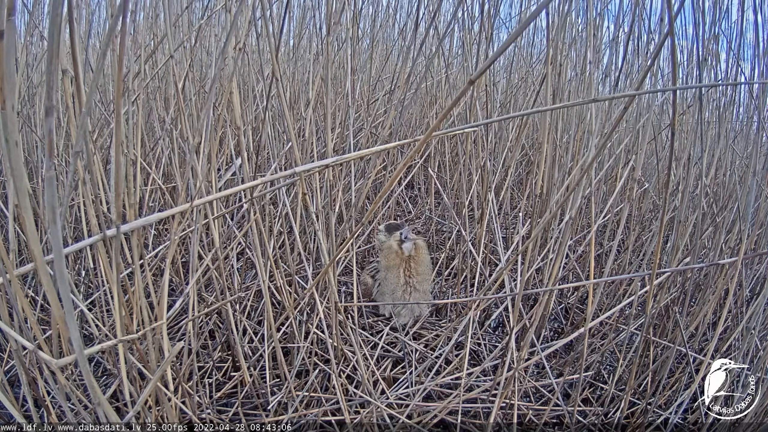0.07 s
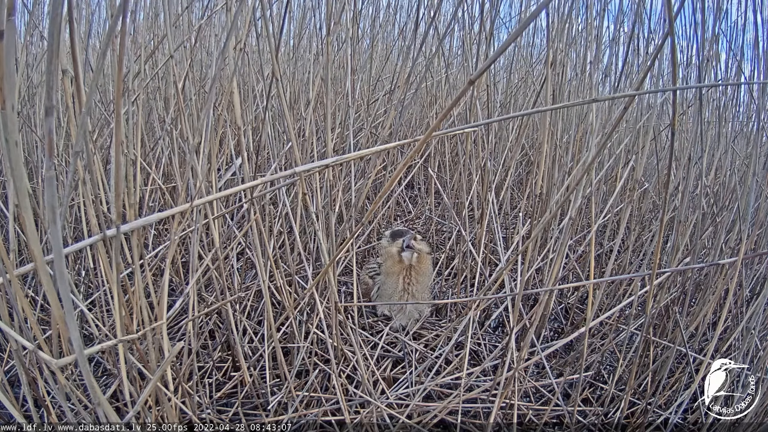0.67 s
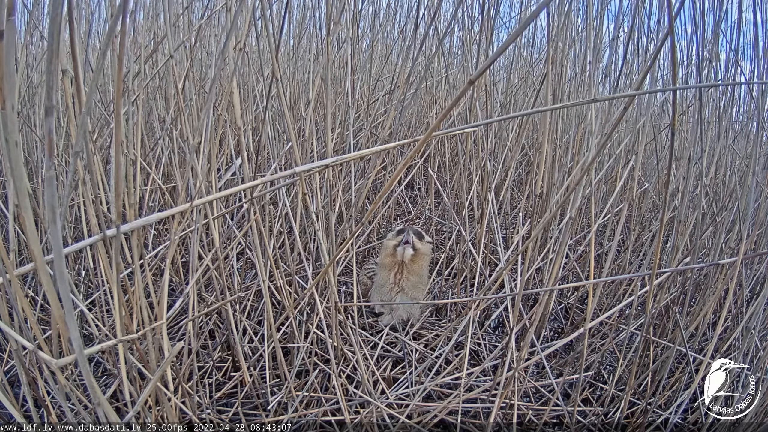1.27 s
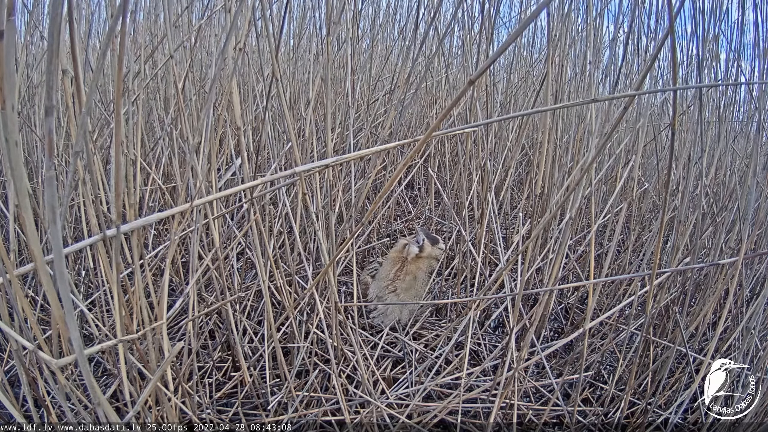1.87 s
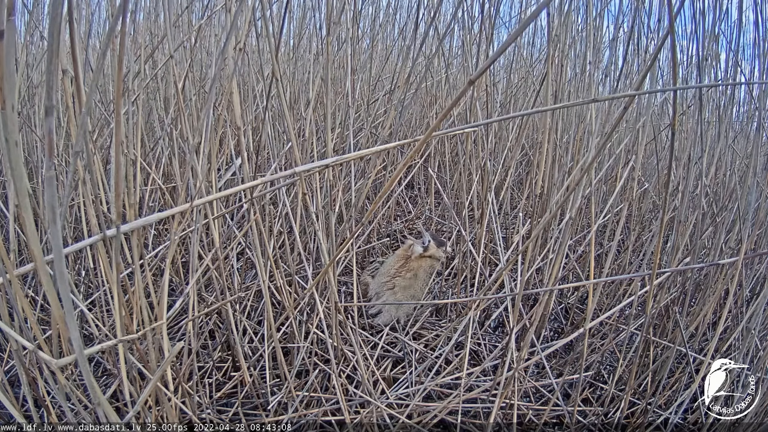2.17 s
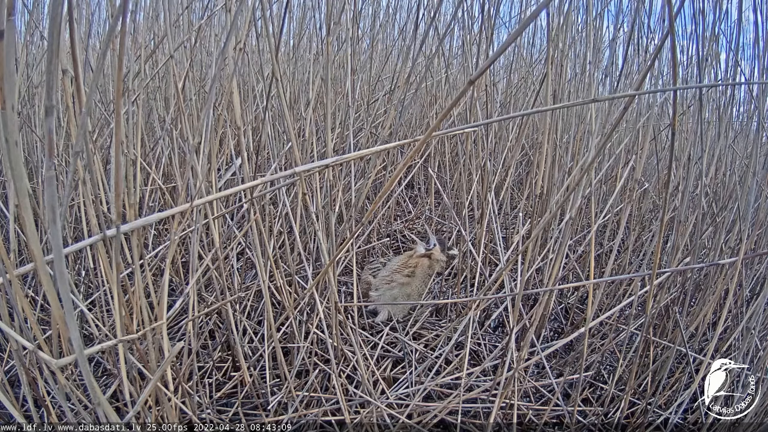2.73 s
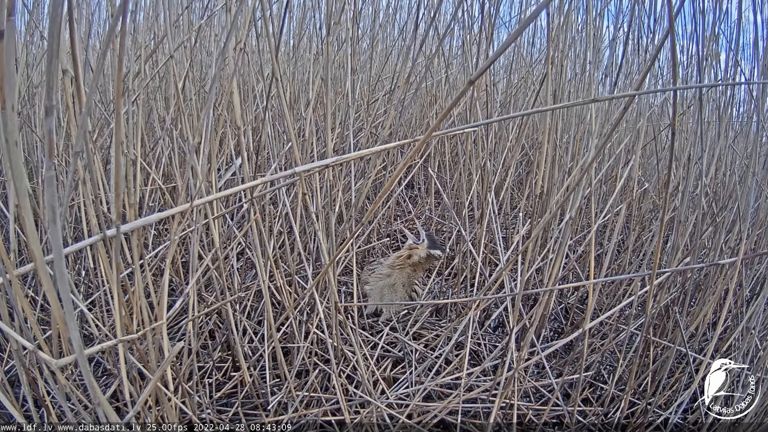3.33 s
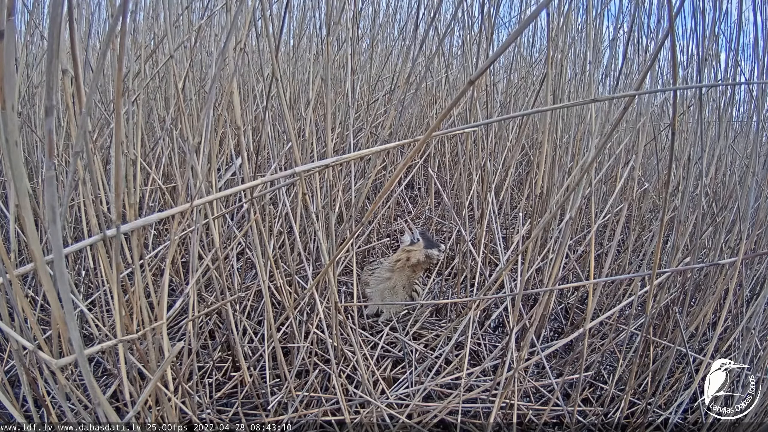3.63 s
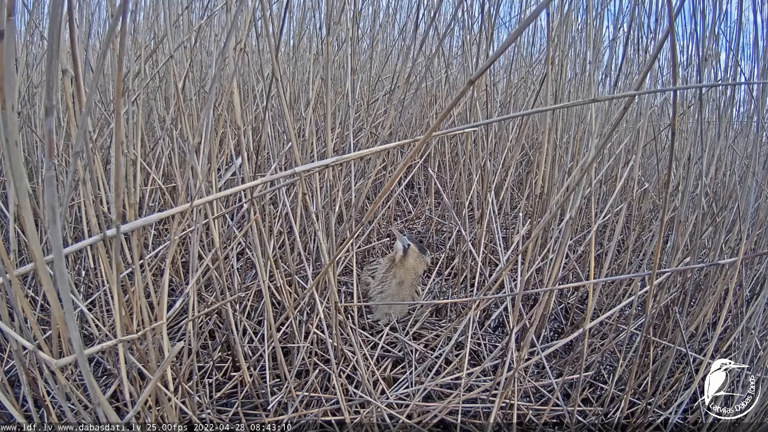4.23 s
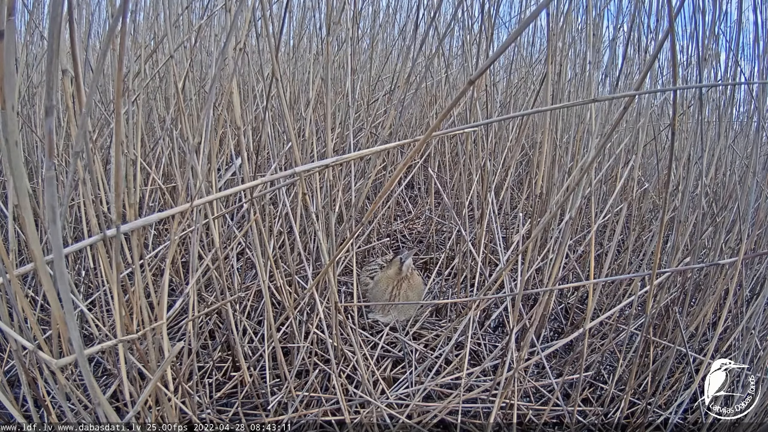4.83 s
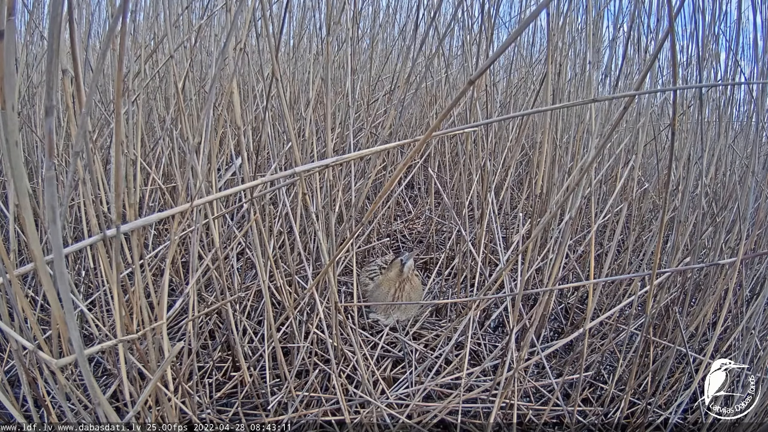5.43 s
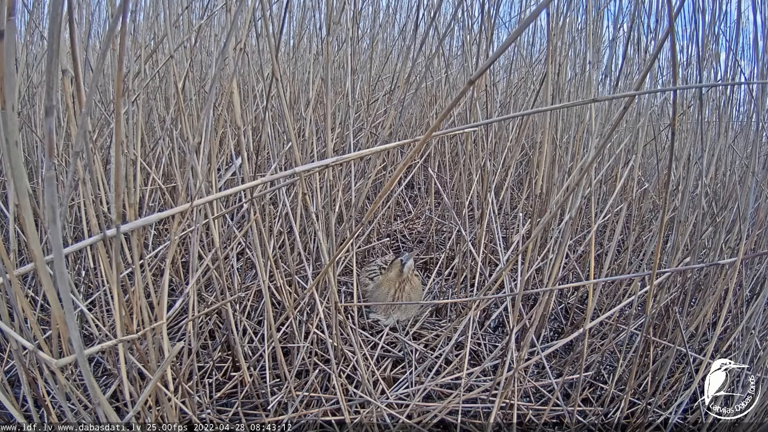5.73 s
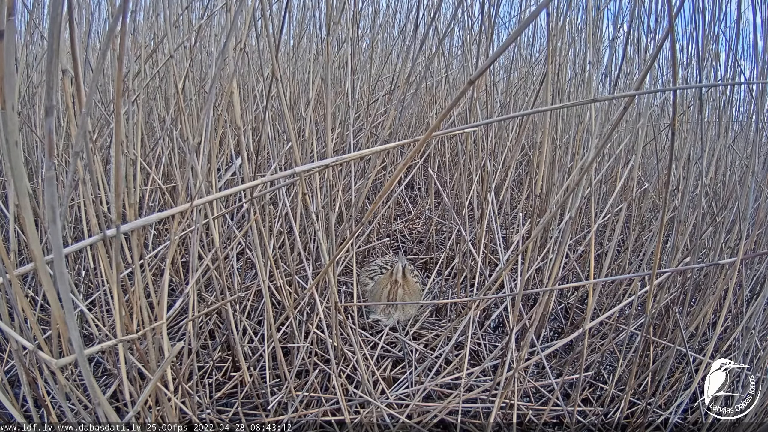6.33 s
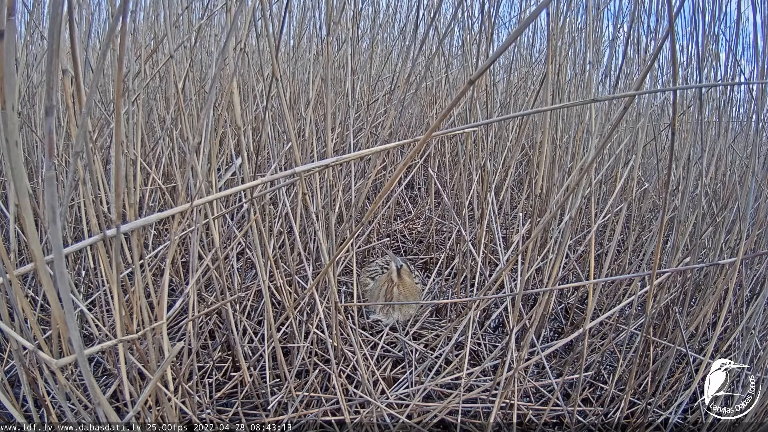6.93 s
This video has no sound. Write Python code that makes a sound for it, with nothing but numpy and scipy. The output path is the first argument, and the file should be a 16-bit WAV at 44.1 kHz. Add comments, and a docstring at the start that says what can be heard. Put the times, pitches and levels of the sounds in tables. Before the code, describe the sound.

A bittern on its nest among reeds gives a loud, harsh squawk that breaks down into dry croaks. About a second later comes a second, longer squawk. Both are so close that the microphone overloads and fizzes. The rest is very quiet: a few faint stem ticks, and gulls wailing and yelping far across the marsh above the blur of their colony.

```python
"""A harsh squawk right at the microphone, then a second: a bittern on its nest in the reeds, so near
that the microphone overloads and fizzes. Membranes slap in its syrinx and ring its stretching throat;
at low pressure they slow to dry croaks. Stems tick in the nest. Far off over the marsh, gulls give long
wails, short yelps and one rasp above the blur of their colony, and another bittern booms once,
very faintly. One microphone, mono; the reeds add a short soft tail."""
import sys
import numpy as np
from scipy import signal
from scipy.fft import rfft, irfft, next_fast_len
from scipy.io import wavfile
from scipy.ndimage import uniform_filter1d, map_coordinates

SR = 44100
rng = np.random.default_rng(int(sys.argv[2]) if len(sys.argv) > 2 else 0)


def waveform_to_disk(signal):
    """Save audio, clipped to [-1, 1], as 16-bit WAV at the path in sys.argv[1]."""
    frames = np.transpose(np.atleast_2d(signal))
    scaled = np.clip(frames, -1, 1) * 32767
    samples = np.round(scaled).astype(np.int16)
    wavfile.write(sys.argv[1], SR, samples)


N = 313110

# the near bittern, one list a squawk: time_s, effort_db, neck_stretch (0 slack, 1 full cry)
SQUAWK_GESTURES = [
    [(0, -6, 1), (.15, -8, .9), (.3, -13, .7), (.32, -18, .25), (.45, -14.5, .33), (.51, -19.5, .22),
     (.54, -30, .25), (.555, -18, .3), (.575, -34, .25)],
    [(1.745, -30, .05), (1.81, -20.5, .45), (1.88, -10, .8), (2.16, -6.5, .95), (2.48, -10.5, .78),
     (2.53, -14.5, .7), (2.68, -15.5, .5), (2.72, -25.5, 0.1), (2.785, -33, .05)],
]
# resonances of the slack throat, before the gape shifts them: centre_hz, width_hz, gain_db
SLACK_THROAT = [(673.5, 120, -14), (976, 140, -4), (1392, 100, 2), (1730, 220, 1), (2382, 280, 3),
                (3120, 230, -8.5), (3852, 150, -20.5), (4600, 180, -17.5), (6200, 250, -20.5)]
# the same with the neck stretched, one list a squawk: centre_hz, width_hz, gain_db
STRETCHED_THROATS = [
    [(700, 130, -28), (1060, 150, -18.5), (1395, 160, -2.5), (1780, 200, -8.5), (2318, 220, 2),
     (3056, 310, -2.5), (3697, 330, -5.5), (5430, 920, -21)],
    [(700, 110, -25.5), (1050, 146.2, -12), (1447, 190, -3.5), (1834, 160, -8), (2406, 200, 4),
     (3165, 237, 2.5), (3550, 270, -9), (4978, 800, -19.5)],
]
# a wider gape shortens the throat and lifts its resonances: time_s, frequency_ratio
GAPE_SHIFT = [(0, 1.046), (.55, 0.97), (1.82, 0.97), (2.3, 1.017), (2.62, 1.032), (2.76, 1.055)]
# the voice cracks upward, turns rough and slides back: time_s, lift_share of the pitch
VOICE_CRACKS = [(.13, .06), (.415, .22), (1.87, .06), (2.44, .06), (2.612, .18)]
# bouts in which the voice catches and bursts out: start_s, burst_count, spacing_s, surge_db
STUTTER_BOUTS = [(.212, 8, 0.013, 5), (.339, 3, .02, 6), (.441, 6, .0135, 5.5), (.553, 2, 0.0083, 6),
                 (1.759, 3, .037, 6), (2.312, 7, 0.012, 4), (2.46, 4, .016, 4.5), (2.538, 2, 0.026, 10.5),
                 (2.614, 8, .0125, 4.5), (2.727, 4, 0.0146, 6.5)]
# high overload fizz of the microphone on loud squawk pulses: frequency_hz, gain_db
OVERLOAD_FIZZ_SPECTRUM = [(2000, -43), (4500, -8.5), (6500, -5.5), (9000, 3.5), (11000, 3), (13000, 2),
                          (14000, 0)]
# single croaking pulses: start_s, strength_db
CROAK_PULSES = [(.593, -20), (.6, -15.5), (.608, -22.5), (0.619, -23), (.637, -29), (0.662, -35),
                (1.699, -19.5), (1.712, -17), (1.727, -13), (2.791, -22.5), (2.816, -36), (2.833, -34)]
# throat resonances in a croak: centre_hz, width_hz, gain_db
CROAK_THROAT = [(806, 130, -4.5), (1096, 300, -15), (1480, 120, 3), (2320, 76, -2), (3020, 200, -8),
                (3800, 280, -13), (4500, 200, -24), (6200, 1200, -42)]
# stems ticking in the nest: start_s, snap_db, thud_db
STEM_TICKS = [(.857, -61, -84), (1.358, -57, -41), (4.145, -56, -90), (4.61, -74, -80)]
# long gull wails: start_s, length_s, pitch_hz, level_db, trill (0-1)
GULL_WAILS = [(.77, 0.3, 1060, -61.5, .15), (.91, 0.15, 1370, -63.5, .5), (1.28, .36, 962, -65, 0.24),
              (2.87, 0.24, 1037, -67, 0.15), (3.18, .18, 1324, -73, 0.51), (3.68, 0.34, 950, -65.5, .3),
              (3.99, .35, 1060, -66.5, .4), (4.89, .31, 987, -61.5, 0.74), (5.15, 0.27, 1090, -64.5, 0.18),
              (6.1, 0.23, 1036, -55, 0.75), (6.32, 0.28, 1082, -65, .15)]
# short gull yelps: start_s, length_s, pitch_hz, level_db, trill (0-1)
GULL_YELPS = [(.832, .06, 1023, -51.5, 0.01), (1.135, 0.052, 1284, -56.5, 0.8),
              (2.855, 0.068, 1052, -56, 0), (4.04, 0.056, 1356, -68, 0.3), (5.6, 0.054, 996, -61.5, 0.25),
              (5.843, 0.058, 976, -61.5, 0.54), (5.9, 0.052, 770, -66.5, 0.23),
              (6.325, 0.049, 923, -60.5, .35), (6.81, 0.066, 1060, -65, 0.8), (6.944, 0.064, 1183, -66, .6),
              (7.025, 0.049, 938, -68.5, 0.13)]
# a wail sags and drops: length_share, pitch_ratio
WAIL_CONTOUR = [(0, 1), (.25, .98), (.5, 0.91), (.75, .87), (1, .75)]
# a yelp holds, then drops: length_share, pitch_ratio
YELP_CONTOUR = [(0, 0.98), (.35, 0.99), (.65, 0.93), (1, .82)]
# a gull's throat in a wail: frequency_hz, gain_db
WAIL_SPECTRUM = [(600, -14), (1000, -26), (1350, -6), (1750, 9), (2200, 9.5), (2750, -17.5), (3650, -7.5),
                 (4200, -24)]
# its throat in a yelp, bill wide open: frequency_hz, gain_db
YELP_SPECTRUM = [(600, -8), (1000, -10), (1350, -14), (1850, 9.5), (2300, 7), (2950, 1.5), (3700, -10),
                 (5000, -20)]
# the far colony as it reaches the microphone: time_s, level_db
COLONY_LEVEL = [(.7, -60), (2.9, -63), (4.5, -69.5), (5.2, -67), (7.1, -72)]
# colour of hoarse gull voices and the colony: frequency_hz, gain_db
COLONY_SPECTRUM = [(500, -18), (1000, -13), (1300, -14), (1700, -5.5), (2200, -2), (2800, -6.5),
                   (4000, -16), (5500, -27), (8000, -36)]
# rumble of distant air: frequency_hz, gain_db
RUMBLE_SPECTRUM = [(8, -1), (20, -2.5), (45, -4), (80, -16), (130, -15.5), (310, -16.5), (480, -26),
                   (900, -34), (2500, -66)]
# the microphone's own hiss: frequency_hz, gain_db
MIC_HISS_SPECTRUM = [(100, -5), (4000, -2.5), (7000, -5), (10000, -1), (13000, -0.5), (14000, -4)]
# time the reed bed takes to die away by 60 dB: frequency_hz, decay_s
REED_DECAY = [(200, 0.36), (2300, 0.28), (5000, .4), (12000, 0.77)]


def squawks(fundamental_db=-24, slack_db=6, edge_hz=7200, rasp_db=-32, fizz_db=-42, fizz_rise_db=22):
    """The bittern's throat shapes the pulses; added noise gives the microphone's fizz at full cry."""
    effort_db, stretch = curves([row for rows in SQUAWK_GESTURES for row in rows])
    pulses, fundamental = syrinx(*voicing(effort_db, stretch))
    source = rattle(stretch) * stem_scatter(filtered(pulses, lambda f: 1 / (1 + (f / edge_hz) ** 8)))
    slack = (1 - stretch) * throat(source, SLACK_THROAT)
    rasp = noise([(80, -20.5), (200, -2), (330, 2.5), (480, -14), (900, -17), (3000, -61.5)])
    chest = amp(fundamental_db + slack_db * (1 - stretch)) * fundamental + amp(rasp_db) * rasp
    overload_fizz = amp(fizz_db + fizz_rise_db * stretch) * noise(OVERLOAD_FIZZ_SPECTRUM)
    bursts = stutter()
    t, out = np.arange(N) / SR, np.zeros(N)
    for rows, modes in zip(SQUAWK_GESTURES, STRETCHED_THROATS):
        voice = steady(slack + stretch * throat(source, modes))
        fizz = overload_fizz * np.abs(uniform_filter1d(voice ** 2, size=40)) ** .48  # on loud pulses
        sounding = uniform_filter1d(1. * ((t >= rows[0][0]) & (t <= rows[-1][0])), size=200)
        out += sounding * amp(effort_db) * (bursts * (voice + fizz) + chest)
    return out


def voicing(effort_db, stretch, full_hz=372, full_db=-5, sag_hz=54.03, quaver_hz=16, quaver_depth=.065):
    """Pitch sags as effort fades; stretching adds quaver and roughness; cracks lift pitch and roughness."""
    t = np.arange(N) / SR
    rise_s, fall_s = .022, .036
    crack = sum(lift * np.exp(-((t - s) / np.where(t < s, rise_s, fall_s)) ** 2)
                for s, lift in VOICE_CRACKS)
    quaver = quaver_depth * stretch ** 2 * np.cos(2 * np.pi * quaver_hz * t)
    pitch = full_hz - sag_hz * (np.maximum(full_db - effort_db, 0) / 10) ** 1.15
    rough = .3 + .22 * stretch ** 2 + 1.6 * crack  # share of turbulence in the voice
    return pitch * (1 + quaver + crack), np.clip(rough, 0, 1)


def syrinx(pitch, rough, jitter=.11, scatter_db=3):
    """Uneven membrane slaps with turbulent air in each cycle; also their fundamental."""
    cycles = np.cumsum(pitch * (1 + jitter * rough * wobble(260))) / SR
    slap_at = np.flatnonzero(np.diff(np.floor(cycles)) > 0)
    slaps = np.zeros(N)
    slaps[slap_at] = amp(scatter_db * rng.standard_normal(N)[:len(slap_at)])
    air = unit(rng.standard_normal(N) * np.exp(-2 * (cycles % 1)))
    fundamental = (1 - rough) * np.sin(2 * np.pi * cycles) * amp(4.8 * wobble(60))
    return np.sqrt(1 - rough) * unit(slaps) + np.sqrt(rough) * air, fundamental


def rattle(stretch, flutter_hz=78, flutter_db=3.5, waver_db=1.12, damping=.5):
    """Slack tissue flutters far below the pitch and chops the airflow; stretching the neck damps it."""
    turns = np.cumsum(flutter_hz * (1 + .2 * wobble(50))) / SR
    depth_db = flutter_db * (1 - damping * stretch ** 2)
    return amp(depth_db * np.sin(2 * np.pi * turns) + waver_db * wobble(170))


def stutter(width_s=.0015):
    """Gain of the bursts: the membranes stick for an instant, then let go, several times in a row."""
    t, gain_db = np.arange(-SR // 50, SR // 50) / SR, np.zeros(N)
    catch_and_burst = np.exp(-(t / width_s) ** 2) - np.exp(-(t / width_s + 2) ** 2)
    for start_s, count, spacing_s, surge_db in STUTTER_BOUTS:
        for k in range(count):
            add(gain_db, start_s + k * spacing_s + t[0], surge_db * catch_and_burst)
    return amp(gain_db)


def throat(source, modes):
    """Resonances that slide with the gape: they ring on a clock that runs faster or slower."""
    n, clock = np.arange(N), np.cumsum(curves(GAPE_SHIFT)[0])
    rung = resonate(map_coordinates(source, [np.interp(n, clock, n)]), modes)
    return map_coordinates(rung, [clock])


def croaks(gain_db=25):
    """The near bird at low pressure: the membranes slap one pulse at a time, each with a puff of air."""
    t, slaps = np.arange(SR // 50) / SR, np.zeros(N)
    for start_s, strength_db in CROAK_PULSES:
        slap = (t == 0) + .16 * rng.standard_normal(len(t))
        add(slaps, start_s, amp(strength_db) * np.exp(-t / .0035) * slap)
    return amp(gain_db) * stem_scatter(resonate(slaps, CROAK_THROAT), spread_s=.0017)


def nest_ticks(snap_decay_s=.02, thud_decay_s=.088):
    """Close by, a dry stem snaps and the nest gives a soft thud."""
    t, snaps, thuds = np.arange(SR // 8) / SR, np.zeros(N), np.zeros(N)
    for start_s, snap_db, thud_db in STEM_TICKS:
        add(snaps, start_s, amp(snap_db - 60 * t / snap_decay_s))
        add(thuds, start_s, amp(thud_db - 60 * t / thud_decay_s))
    snaps *= noise([(500, -16), (3200, 1.5), (5000, -12), (13000, -14)])
    thuds *= noise([(30, 18), (130, 21.5), (300, 2.5), (1000, -23), (3000, -69.5)])
    return snaps + thuds


def gulls(cries, contour, spectrum, trill_hz=81, trill_depth=.15, throb=.3, chaos=.018, hoarse_db=-13):
    """Far over the marsh, arched cries throb throughout and break into a hoarse trill at their height."""
    out, hoarse = np.zeros(N), np.zeros(N)
    for start_s, length_s, pitch_hz, level_db, trill in cries:
        n = int(length_s * SR)
        u = np.arange(n) / n
        height = np.sin(np.pi * u ** .68) ** 3  # peaks early in the cry
        beat = np.sin(2 * np.pi * trill_hz * u * length_s + .12 * wobble(19, size=SR)[:n])
        scoop = 1 - .32 * trill * np.exp(-(u / .1) ** 2)  # a trilled cry starts below its pitch
        pitch = pitch_hz * np.interp(u, *np.transpose(contour)) * scoop
        warble = 1 + trill * trill_depth * height * beat + chaos * wobble(500, size=SR)[:n]
        phase = 2 * np.pi * np.cumsum(pitch * warble) / SR
        cry = sum(amp(along(spectrum, k * pitch)) * np.sin(k * phase) for k in range(1, 5))
        envelope = np.sin(np.pi * u) ** .47 * (1 - throb * (1 - trill / 2) * beat)
        add(out, start_s, amp(level_db + wobble(38.5, size=SR)[:n]) * unit(cry * envelope))
        add(hoarse, start_s, amp(level_db + hoarse_db) * trill * height)
    return out + hoarse * noise(COLONY_SPECTRUM)


def gull_rasp(start_s=3.41, attack_s=.047, fade_s=.24, level_db=-58):
    """One distant gull rasps without a tone: a quick swell and a slow fade."""
    t = np.maximum(np.arange(N) / SR - start_s, 0)
    swell = np.minimum(t / attack_s, 1) * np.exp(-t / fade_s)
    envelope = amp(level_db + 2.1 * wobble(76)) * swell
    return envelope * noise([(500, -20), (1000, -5), (2300, 5), (3200, -9), (4500, -24), (9000, -50.5)])


def far_boom(start_s=4.53, length_s=.48, pitch_hz=140, level_db=-64.5):
    """A far bittern's one hollow note swells and fades."""
    t = np.arange(N) / SR
    swell = np.sin(np.pi * np.clip((t - start_s) / length_s, 0, 1))
    return amp(level_db) * swell * np.sqrt(2) * np.sin(2 * np.pi * pitch_hz * t)


def marsh(patchy_db=3, rumble_db=-70, hiss_db=-76):
    """The bed: the far colony's blurred clamour over a rumble of air and faint microphone hiss."""
    spectra = signal.stft(noise(COLONY_SPECTRUM), nperseg=1024)[2]
    patches = uniform_filter1d(rng.standard_normal(spectra.shape), size=4, axis=0)  # blur in frequency
    patches = unit(uniform_filter1d(patches, size=5, axis=1))  # and in time
    clamour = unit(signal.istft(spectra * amp(patchy_db * patches), nperseg=1024)[1][:N])
    rumble = amp(rumble_db + 1.8 * wobble(10)) * noise(RUMBLE_SPECTRUM)
    return amp(curves(COLONY_LEVEL)[0]) * clamour + rumble + amp(hiss_db) * noise(MIC_HISS_SPECTRUM)


def stem_scatter(x, spread_s=.0089):
    """Stems close to the bird delay each frequency a little differently, which smears sharp pulses."""
    def response(f):
        offsets = np.interp(f, np.linspace(0, SR / 2, num=90), rng.uniform(-1, 1, size=90))
        delay_s = offsets * spread_s / 2
        return np.exp(-2j * np.pi * np.cumsum(delay_s) * f[1])
    return filtered(x, response)


def reed_tail(x):
    """Countless stems across the reed bed scatter the sound into a short soft tail."""
    hz, t, spectra = signal.stft(rng.standard_normal((2, SR))[0], SR, nperseg=256)
    decay = amp(-60 * t / along(REED_DECAY, hz)[:, None])
    tail = signal.istft(spectra * decay, SR, nperseg=256)[1]
    return signal.fftconvolve(x, tail / np.linalg.norm(tail))[:N]


def amp(db):
    """Decibels to gain."""
    return 10 ** (np.asarray(db) / 20)


def unit(x):
    """x at rms 1."""
    return x / np.sqrt(np.mean(x ** 2) + 1e-20)


def along(points, hz):
    """Read (frequency_hz, value) points on a log axis."""
    f, values = np.transpose(points)
    return np.interp(np.log(hz + 1), np.log(f + 1), values)


def curves(rows):
    """One value per sample for each column after time_s."""
    time_s, *columns = np.transpose(rows)
    return [np.interp(np.arange(N) / SR, time_s, column) for column in columns]


def wobble(rate, size=N):
    """A smooth random curve, rate knots a second."""
    return map_coordinates(rng.standard_normal(size // 8), [np.arange(size) * rate / SR], mode="wrap")


def filtered(x, response):
    """x times a complex response of frequency."""
    m = next_fast_len(N + SR // 2)
    return irfft(rfft(x, m) * response(np.fft.rfftfreq(m, 1 / SR)), m)[:N]


def resonate(x, modes, skirt=.41):
    """x through a bank of (centre_hz, width_hz, gain_db) resonances with steep skirts."""
    def response(f):
        power = 1e-9
        for hz, width, db in modes:
            detune = (f * f - hz * hz) / (f * width + 1e-9)
            power = power + amp(db) ** 2 / ((1 + detune ** 2) * (1 + (skirt * detune) ** 2))
        cepstrum = irfft(np.log(power))
        cepstrum[0] /= 2
        cepstrum[len(f):] = 0  # one-sided, so that the throat rings after each pulse
        return np.exp(rfft(cepstrum))
    return filtered(x, response)


def noise(spectrum):
    """Noise of rms 1, coloured by (frequency_hz, gain_db) points."""
    return unit(filtered(rng.standard_normal(N), lambda f: amp(along(spectrum, f))))


def steady(x, size=1300):
    """x with its running rms held at 1."""
    power = uniform_filter1d(uniform_filter1d(x * x, size), size // 2)
    return x / np.sqrt(np.abs(power) + 1e-12)


def add(track, start_s, sound):
    """Mix a sound into the track at start_s."""
    part = track[max(round(start_s * SR), 0):][:len(sound)]
    part += sound[:len(part)]


def scene():
    """From beside the nest: the near bird almost dry, the far gulls washed by the reeds."""
    near = squawks() + croaks() + nest_ticks()
    far = gulls(GULL_WAILS, WAIL_CONTOUR, WAIL_SPECTRUM)
    far += gulls(GULL_YELPS, YELP_CONTOUR, YELP_SPECTRUM) + gull_rasp()
    tails = amp(-10) * reed_tail(far) + amp(-20) * reed_tail(near)
    return (near + far + tails + far_boom() + marsh())[None]


def record(dry, ceiling=.71, knee=5, offset=.008, top_hz=14000):
    """The microphone flattens loud peaks; the recorder has a small offset and a band limit."""
    x = dry[0]
    limit = ceiling * (1 + .06 * np.sign(x))  # the negative side overloads a little sooner
    x = x / (1 + np.abs(x / limit) ** knee) ** (1 / knee)
    return offset + filtered(x, lambda f: 1 / np.sqrt(1 + (f / top_hz) ** 80))[None]


dry = scene()
out = record(dry)
waveform_to_disk(out)
```